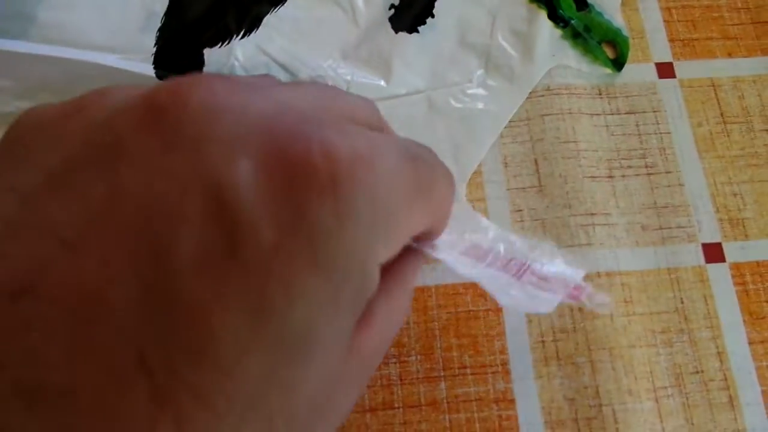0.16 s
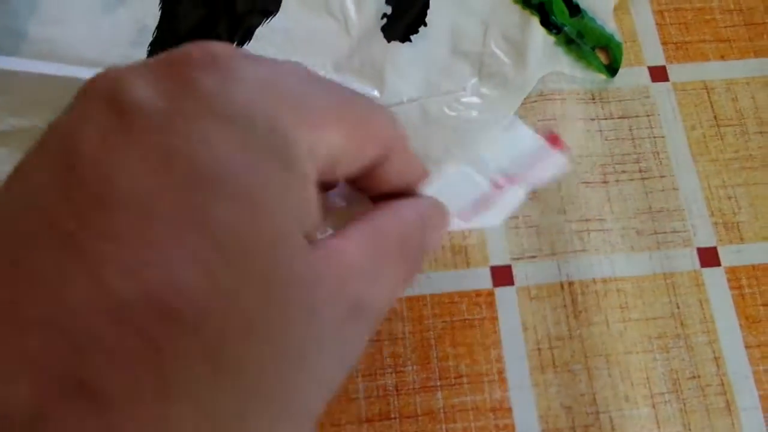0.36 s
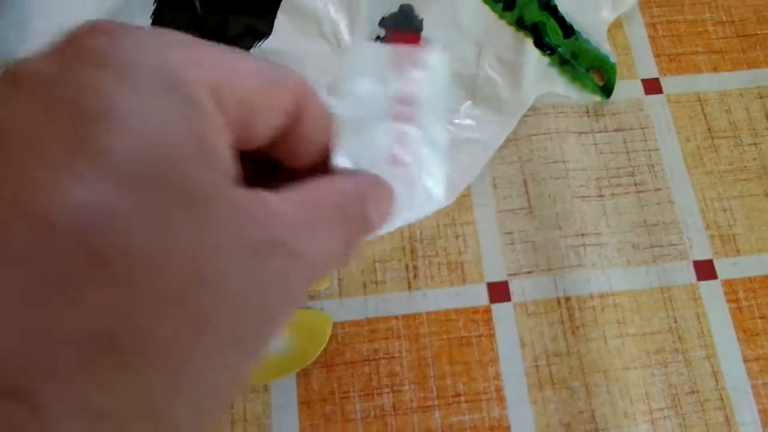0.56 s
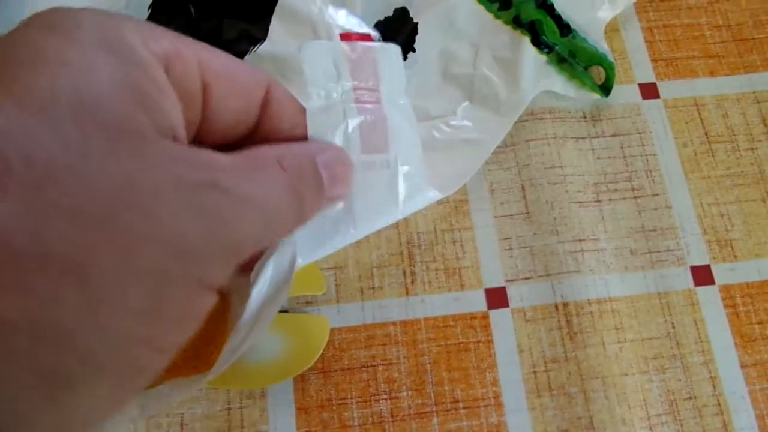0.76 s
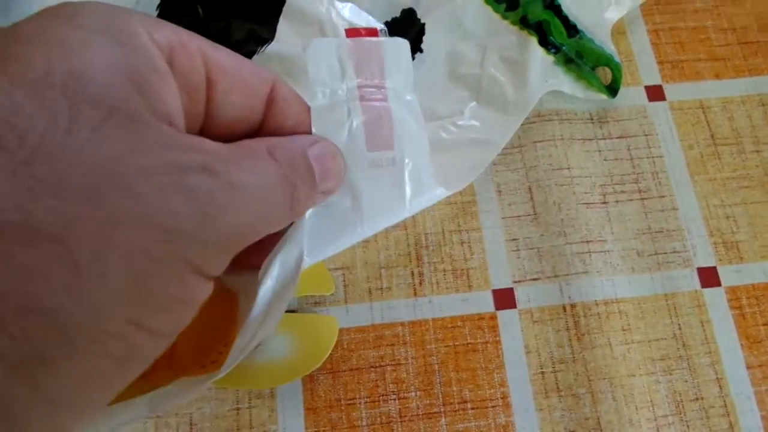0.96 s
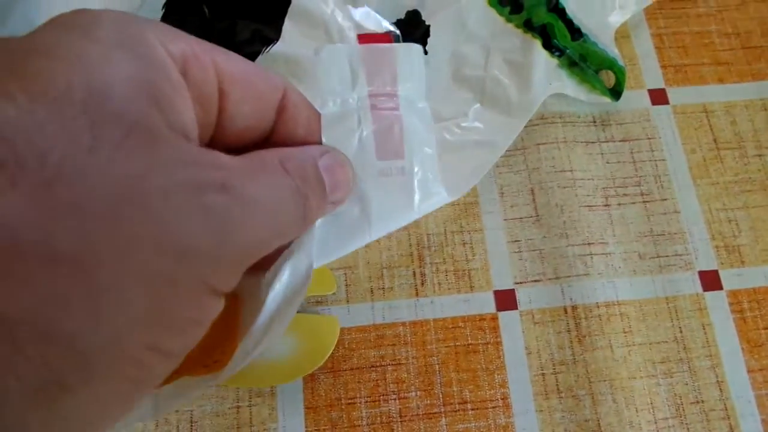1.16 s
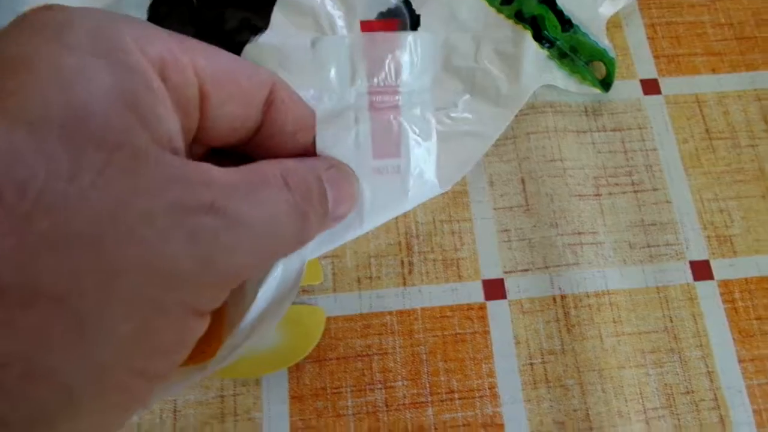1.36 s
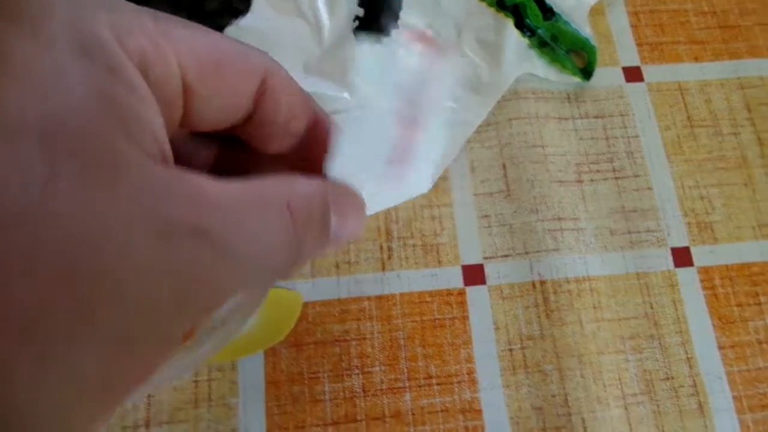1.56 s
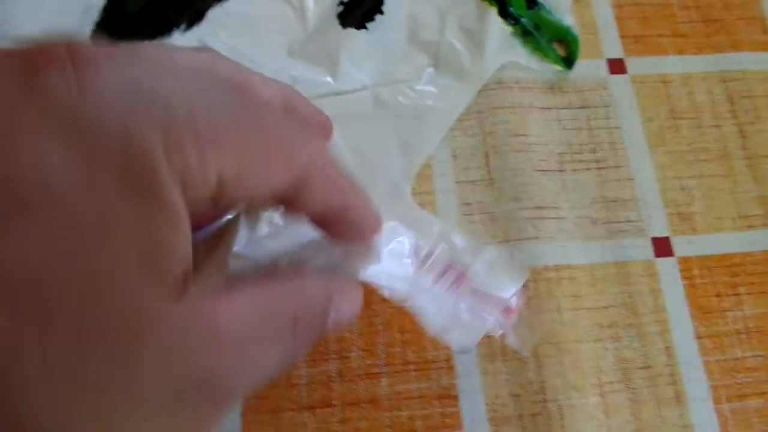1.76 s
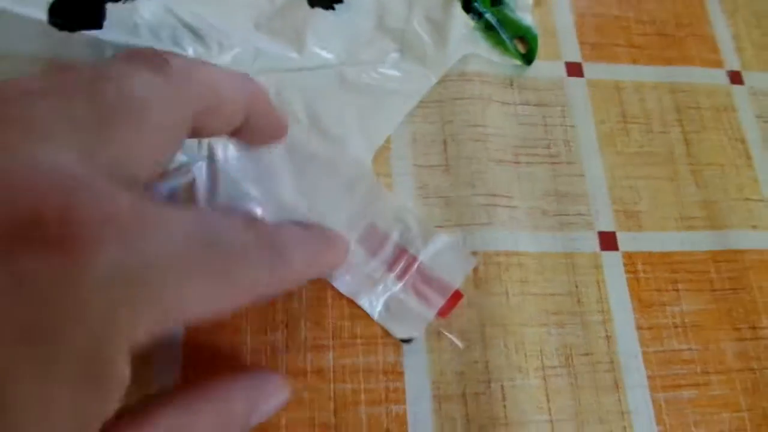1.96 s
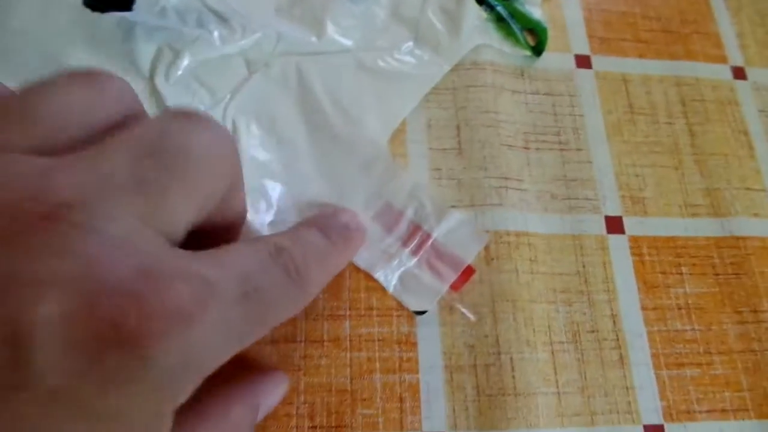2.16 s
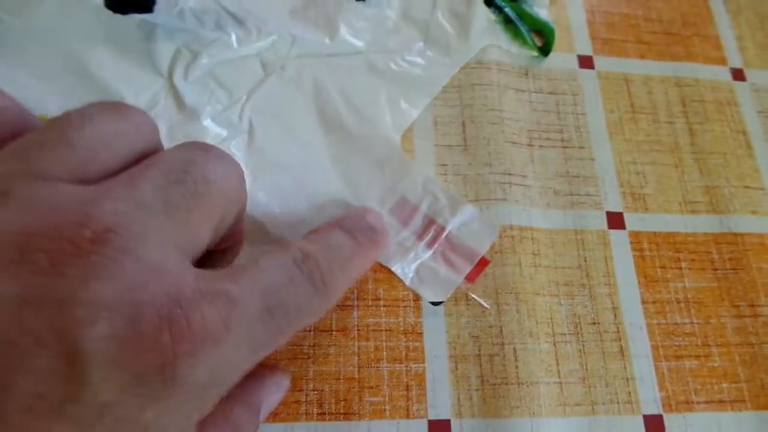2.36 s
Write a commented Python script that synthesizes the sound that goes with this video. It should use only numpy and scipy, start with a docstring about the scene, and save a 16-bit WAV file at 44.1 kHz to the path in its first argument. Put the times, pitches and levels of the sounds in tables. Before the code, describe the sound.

A flat foil balloon rustles and snaps in a hand, quiets briefly, then crinkles again.

```python
"""A hand lifts a flat foil balloon by its plastic tab in a small room: the film slides and rustles,
and its creases snap one by one, each with a sharp crack and a brief ring, among a few hollow pocks.
After about a second the hand holds the balloon, and little is left but faint rustles and quiet air.
From about 1.6 s it lays the balloon back on the table, and the snaps and pocks return.
Throughout, tiny crackles follow the sliding, over the hand's dull rub and its soft bumps on the table."""
import sys
import numpy as np
from scipy import signal
from scipy.fft import rfft, irfft
from scipy.io import wavfile

SR = 44100
rng = np.random.default_rng(int(sys.argv[2]) if len(sys.argv) > 2 else 0)


def transcribe(signal):
    """Save signal, clipped to [-1, 1], as a 16-bit WAV file at the path in sys.argv[1]."""
    frames = np.atleast_2d(signal).T
    limited = np.clip(frames, -1, 1)
    pcm = np.round(limited * 32767).astype(np.int16)
    wavfile.write(sys.argv[1], SR, pcm)


N = 105840
T = np.arange(N) / SR
SNAP_SAMPLES, SNAP_SPAN_S = 600, .003
CRACK_LOW_HZ, CRACK_HIGH_HZ, SIZZLE_HZ, CUTOFF_HZ = 1610, 6680, 9100, 16600


# Each crease that snaps: t/s, ring f/Hz, ring level/dB, crack level/dB, sizzle level/dB
CREASE_SNAPS = [(0.0131, 3200, -62, -68, -53.5), (0.0268, 2830, -53, -47.5, -52),
                (0.055, 4070, -54, -72, -71), (0.1027, 2710, -46, -55, -47.5),
                (0.2066, 2800, -52.5, -54, -69), (0.2503, 3600, -56.0, -61, -53.0),
                (0.2637, 3300, -40.5, -54, -34), (0.2697, 4350, -45.5, -49, -43),
                (0.2784, 2980, -51.0, -56, -48), (0.2802, 2480, -41, -48, -45.0),
                (0.285, 4050.0, -52, -46, -45), (0.3486, 3430, -29, -39.5, -34.5),
                (0.3618, 5470.0, -44.0, -39, -42), (0.4127, 3250, -31.5, -30, -29),
                (0.4255, 3180, -51, -57, -57), (0.4438, 2240.0, -44, -59, -59),
                (0.4486, 2980, -32.5, -35.5, -38.5), (0.4553, 2930.0, -37.5, -48, -47),
                (0.4772, 2640, -36.5, -46, -43), (0.4793, 2430, -41, -46, -39.5),
                (0.486, 7150.0, -44.5, -51, -46.0), (0.495, 3230.0, -46, -48, -46),
                (0.532, 3100.0, -46.5, -49.0, -60.0), (0.5448, 2250, -44.5, -49, -52.0),
                (0.558, 1770.0, -46.5, -45, -40.5), (0.5619, 4300, -48, -38.5, -32),
                (0.5669, 3360.0, -51, -45, -44), (0.5845, 7000, -48, -48.0, -49.0),
                (0.587, 6760, -53, -41.5, -36.5), (0.593, 6720.0, -54, -54, -52),
                (0.6016, 5430, -54.0, -48.0, -59), (0.6147, 6980.0, -39, -40.0, -45.0),
                (0.6227, 6940, -41, -44, -43.0), (0.6336, 7100, -52.0, -48, -55),
                (0.6404, 5860.0, -57.0, -58, -51), (0.6665, 2400, -51, -56, -47),
                (0.6714, 6930.0, -50, -57, -42.5), (0.6788, 1770, -49, -54, -49),
                (0.7047, 1870, -54, -65, -48), (0.7214, 4800, -46, -46, -47),
                (0.7571, 2450, -56, -64, -68.0), (0.7781, 2660, -53, -59, -64),
                (0.828, 5680.0, -56.5, -54, -71.0), (0.8558, 2920, -49, -49.5, -65),
                (0.9155, 4620, -47.5, -47.5, -41), (0.963, 5770.0, -57, -65.0, -57),
                (0.9913, 4100, -52.5, -60, -66), (0.9915, 5600, -57, -66, -76),
                (1.029, 5600.0, -52.5, -65, -78), (1.0302, 4100, -58, -57, -78),
                (1.1294, 6030.0, -66, -66, -81), (1.5899, 4260.0, -75, -56.5, -58),
                (1.6353, 2570, -61, -57, -65.0), (1.6539, 2750, -64, -65, -53.5),
                (1.6602, 2770, -55.5, -57, -59), (1.692, 2710.0, -57.5, -55, -58),
                (1.705, 2450.0, -59, -57, -66), (1.7583, 2780, -54.5, -62, -69.0),
                (1.7639, 2600, -55, -60, -68), (1.797, 3100.0, -50, -54, -68.0),
                (1.841, 3140.0, -56, -58.0, -62), (1.8549, 3300, -52, -64, -62),
                (1.8656, 3470, -54.0, -50, -59.0), (1.8793, 3340, -44.5, -55, -56),
                (1.8869, 3700, -43.5, -62, -50), (1.8889, 3570, -45.5, -46.5, -58.5),
                (1.9493, 3100, -48, -51.5, -70), (1.952, 2970.0, -54, -64, -68.0),
                (2.094, 2840.0, -53, -56.0, -45.5), (2.1017, 2390, -46, -48, -42.0),
                (2.1073, 2840.0, -45.5, -55.0, -58), (2.1161, 2610, -48, -44, -55),
                (2.1178, 3050, -40, -40.5, -43), (2.1468, 3600.0, -48, -40, -40),
                (2.1791, 2030, -53, -48.0, -57), (2.1842, 2800.0, -53.0, -59.0, -63.0),
                (2.2207, 2840.0, -57, -61, -70.0), (2.2365, 3200, -57.5, -64.0, -64),
                (2.3178, 2480, -50.5, -54.5, -57), (2.3303, 5750, -59, -59, -71.0),
                (2.3487, 2450.0, -47.5, -49.0, -49), (2.3574, 2420, -47, -56, -70),
                (2.3651, 1860, -50, -52.0, -69.0), (2.3792, 2100, -53, -48, -59)]

def creases(bands):
    """Creases snap one by one; each sits at another spot, so each gets its own room echo."""
    out = np.zeros(N)
    for s, *voice in CREASE_SNAPS:
        add(out, s, room(snap(bands, *voice)))
    return out


def snap(bands, hz, ring_db, crack_db, sizzle_db):
    """One crease flips: the film rings and cracks, and a high sizzle flutters out."""
    crack_band, sizzle_band = bands
    t = T[:SNAP_SAMPLES]
    overtone = film_ring(hz * 1.36, start_turn=rng.random())
    ring = film_ring(hz) + from_db(-13) * overtone
    fade = np.exp(-t / .00045) + from_db(-16) * np.exp(-t / .002)   # a fast drop, then a softer flutter
    roughness, hiss = rng.standard_normal((2, SNAP_SAMPLES)) * fade
    crack = signal.sosfilt(crack_band, film_crack(roughness))
    sizzle = signal.sosfilt(sizzle_band, hiss)
    return at_level(ring, ring_db) + at_level(crack, crack_db) + at_level(sizzle, sizzle_db)


def film_ring(hz, rise_cycles=1.25, start_turn=0):
    """The film vibrates at one pitch: it swells and is gone a few cycles later."""
    turns = hz * np.arange(SNAP_SAMPLES) / SR
    tone = np.sin(2 * np.pi * (turns + start_turn))
    return tone * turns / rise_cycles * np.exp(-turns / rise_cycles)


def film_crack(roughness):
    """A sharp click, roughened with noise, and its weaker bounce off the table."""
    t = T[:SNAP_SAMPLES]
    delay_s = rng.uniform(.0005, .0013)
    click = rms_one(bending_wave()) * rng.choice([-1, 1])
    direct = click + from_db(-4) * rms_one(roughness)
    bounce = np.interp(t - delay_s, t, direct, left=0)
    return direct + from_db(-8) * bounce


def bending_wave(spread_s=0.000795):
    """High ripples cross the film faster than low ones, smearing a click into a tiny falling sweep."""
    hz = np.fft.rfftfreq(SNAP_SAMPLES, 1 / SR)
    first, last = CRACK_HIGH_HZ ** -.5, CRACK_LOW_HZ ** -.5   # travel time goes as 1 / sqrt(frequency)
    turns = spread_s / (last - first) * (2 * np.sqrt(hz) - first * hz)
    spectrum = np.exp(-2j * np.pi * turns) / np.sqrt(1 + (hz / CRACK_HIGH_HZ) ** 8)
    sweep = np.roll(irfft(spectrum, SNAP_SAMPLES), 6)
    return sweep * np.linspace(1, 0, SNAP_SAMPLES) ** 2


# Each time a wide panel of film buckles: t/s, level/dB
PANEL_POCKS = [(.2375, -40.5), (.2768, -45), (.3484, -46), (.4133, -50), (.5565, -54), (2.1016, -49.5),
               (2.1165, -41), (2.3785, -53)]

def pocks():
    """A wide panel of the film buckles with a hollow pock that echoes in the room."""
    out = np.zeros(N)
    for s, db in PANEL_POCKS:
        pock = film_ring(hz=1360, rise_cycles=0.94)
        add(out, s, room(at_level(pock, db)))
    return out


# Each slide of the film: peak t/s, half length t/s, relative level/dB, treble tilt/(dB per octave)
FILM_SLIDES = [(.04, 0.034, -59.5, -4), (0.116, 0.024, -48, -0.5), (0.177, 0.18, -53.5, 2.5),
               (0.272, 0.034, -43, -1), (0.36, 0.02, -41.5, 1), (0.465, 0.078, -46, -1),
               (0.573, 0.092, -47.5, 2), (0.697, 0.041, -44.5, 3), (0.792, 0.11, -56.5, -1),
               (0.926, 0.0091, -46, 8), (0.982, .06, -66, -2), (1.281, 0.03, -56.5, 0.5),
               (1.392, 0.04, -58.5, 0.5), (1.538, 0.036, -53.5, 5.5), (1.66, 0.11, -58, 3),
               (1.76, 0.078, -56.5, 1), (1.877, 0.042, -47.5, 2.5), (1.942, 0.049, -57.5, 6),
               (2.112, 0.019, -42, 2.5), (2.172, .04, -52, 7), (2.371, 0.087, -54.5, 2)]
# Tone colour of the sliding film: f/Hz, relative level/dB
RUSTLE_COLOUR = [(150, -16.5), (600, 2.5), (1300, 10), (1900, 3), (2500, 11), (3300, 6), (4500, 3.5),
                 (8000, 0.5), (12000, -1), (14800, -2), (17000, -27.5)]

def rustle(slips_per_s=9000, spread_db=2.5, gain_db=-7.5, samples=20000):
    """The film slides in thousands of tiny slips a second, which blur into a rustle."""
    out = np.zeros(N)
    for s, half_s, db, tilt_db in FILM_SLIDES:
        start = max(s - samples / 2 / SR, 0)
        slips = (rng.random(samples) < slips_per_s / SR) * rng.choice([-1, 1], samples)
        sizes = from_db(spread_db * np.minimum(rng.exponential(1, samples), 5))
        loudness = swell(start + T[:samples], s, half_s, db + gain_db)
        add(out, start, loudness * coloured(slips * sizes, RUSTLE_COLOUR, tilt_db))
    return out


def crackles(bands, per_s=110, low_hz=1640, high_hz=7200, count=400):
    """Small creases give way at random, as strongly as the film is sliding."""
    out = np.zeros(N)
    times = np.cumsum(rng.exponential(1 / per_s, count))
    motion = np.sqrt(sum(swell(times, *slide[:3]) ** 2 for slide in FILM_SLIDES))
    pitches = low_hz * (high_hz / low_hz) ** rng.random(count)
    levels = -13 + 2 * np.clip(rng.standard_normal(count), -2, 2)   # dB, relative to the motion
    for s, gain, hz, db in zip(times, motion, pitches, levels):
        if s < N / SR:
            add(out, s, gain * snap(bands, hz, ring_db=db, crack_db=db - 5, sizzle_db=db - 8))
    return out


# How loudly the hand rubs: t/s, level/dB
RUB_LOUDNESS = [(0, -64.5), (.12, -66), (.22, -63), (.27, -59), (.33, -60), (.48, -57.5), (.62, -58.5),
                (.76, -62.5), (.89, -66), (.93, -63), (1.08, -69), (1.22, -100), (1.29, -74), (1.47, -71.5),
                (1.54, -69), (1.8, -67), (1.88, -61.5), (1.97, -62.5), (2.07, -72), (2.11, -59.5),
                (2.26, -64.5), (2.4, -61.5)]
# Tone colour of the rub: f/Hz, relative level/dB
RUB_COLOUR = [(20, -21), (50, -2), (90, -3), (150, 0), (250, 1), (500, 0), (900, -1.5), (1600, -8),
              (4000, -17)]

def hand_rub():
    """The hand rubs on film and cloth: a dull noise that rises and falls."""
    loudness = from_db(np.interp(T, *np.transpose(RUB_LOUDNESS)))
    return loudness * coloured(rng.standard_normal(N), RUB_COLOUR)


# Each nudge of the table: peak t/s, half length t/s, level/dB
TABLE_NUDGES = [(0.133, 0.034, -74), (0.296, 0.037, -63.5), (1.883, 0.036, -67), (2.14, 0.034, -76),
                (2.3, .05, -74)]

def nudges():
    """The table top gives soft, low bumps under the hand."""
    rumble = signal.sosfilt(band(low_hz=55, high_hz=124.6), rng.standard_normal(N))
    return rms_one(rumble) * sum(swell(T, *nudge) for nudge in TABLE_NUDGES)


# Tone colour of the quiet room: f/Hz, relative level/dB
AIR_COLOUR = [(20, 4.5), (60, 4.5), (250, 4.5), (700, 2), (1500, 0.5), (4000, -8), (10000, -7.5),
              (16000, -11)]

def still_air(level_db=-69):
    """The quiet room is a faint, steady hush."""
    return from_db(level_db) * coloured(rng.standard_normal(N), AIR_COLOUR)


def room(x, fade_s=0.49, build_s=0.001, echo_db=-10):
    """Hard walls add a bright wash of echoes, which drops by 60 dB in fade_s."""
    t = T[:SR // 2]
    tail = rng.standard_normal(len(t)) * from_db(-60 * t / fade_s) * (1 - np.exp(-t / build_s))
    echoes = signal.fftconvolve(x, from_db(echo_db) * tail / np.linalg.norm(tail))
    return (echoes + np.pad(x, (0, len(t) - 1)))[:N]


def from_db(db):
    """Turn decibels into a number to multiply by."""
    return 10 ** (np.asarray(db) / 20)


def rms_one(x):
    """Scale a sound so that its average strength (rms) is 1."""
    return x / np.sqrt(np.mean(x ** 2) + 1e-20)


def at_level(x, db):
    """Give a short sound the energy of a steady one at this level lasting SNAP_SPAN_S."""
    return from_db(db) * rms_one(x) * np.sqrt(SNAP_SPAN_S * SR / len(x))


def swell(t, peak_s, half_s, db):
    """A movement swells and fades as a bell curve."""
    return from_db(db) * np.exp(-((t - peak_s) / half_s) ** 2)


def coloured(x, colour, tilt_db=0, pivot_hz=5000):
    """Give a sound a tone colour, brighter by tilt_db per octave, at strength 1."""
    octave = np.log2(np.maximum(np.fft.rfftfreq(len(x), 1 / SR), 1))
    hz, db = np.transpose(colour)
    gain = from_db(np.interp(octave, np.log2(hz), db) + tilt_db * (octave - np.log2(pivot_hz)))
    return rms_one(irfft(rfft(x) * gain, len(x)))


def band(low_hz, high_hz):
    """A filter that cuts gently below low_hz and steeply above high_hz."""
    low_cut = signal.butter(2, low_hz, "high", fs=SR, output="sos")
    high_cut = signal.butter(6, high_hz, "low", fs=SR, output="sos")
    return np.vstack([low_cut, high_cut])


def add(out, s, sound):
    """Mix a sound in, starting at s seconds."""
    i = int(np.clip(s * SR, 0, N - 1))
    out[i:i + len(sound)] += sound[:N - i]


def scene():
    """Foil in the room, over the rub of the hand, the table's bumps and still air."""
    background = hand_rub() + still_air()
    bands = band(CRACK_LOW_HZ, CRACK_HIGH_HZ), band(SIZZLE_HZ, CUTOFF_HZ)
    foil = creases(bands) + pocks() + room(rustle()) + room(crackles(bands))
    return (foil + nudges() + background)[None]


def record(dry):
    """The very highest treble is cut off steeply."""
    return signal.sosfilt(signal.cheby2(18, 60, CUTOFF_HZ, fs=SR, output="sos"), dry)


dry = scene()
out = record(dry)
transcribe(out)
```